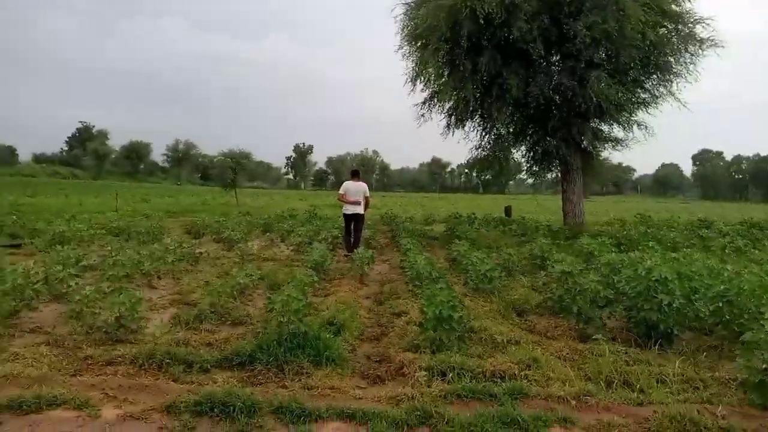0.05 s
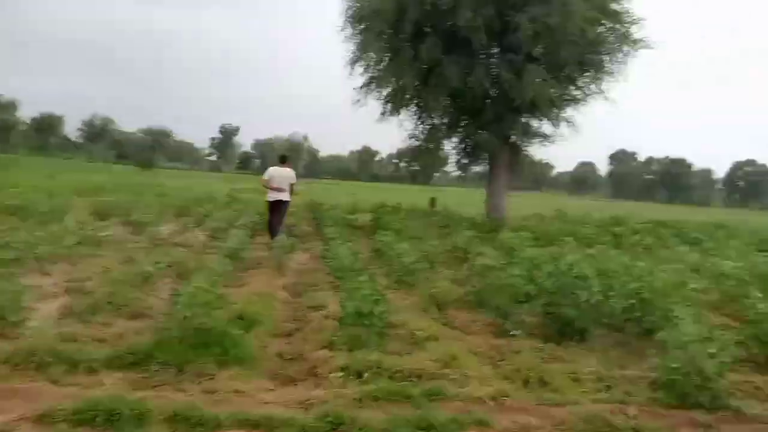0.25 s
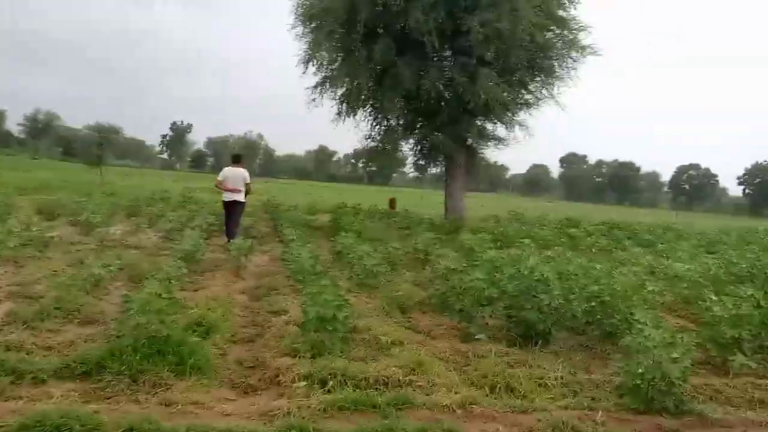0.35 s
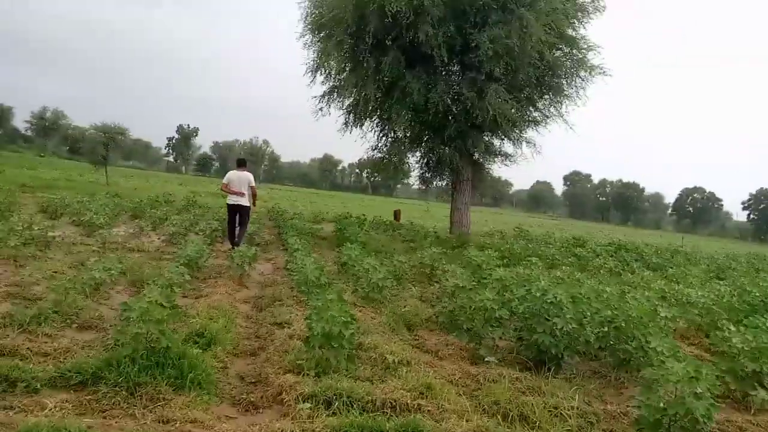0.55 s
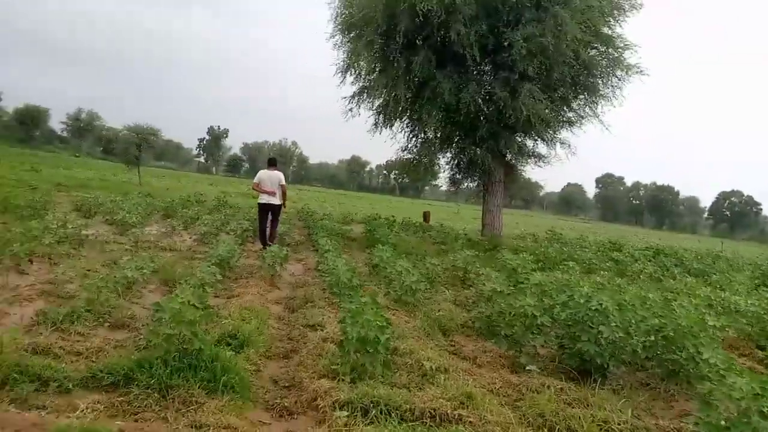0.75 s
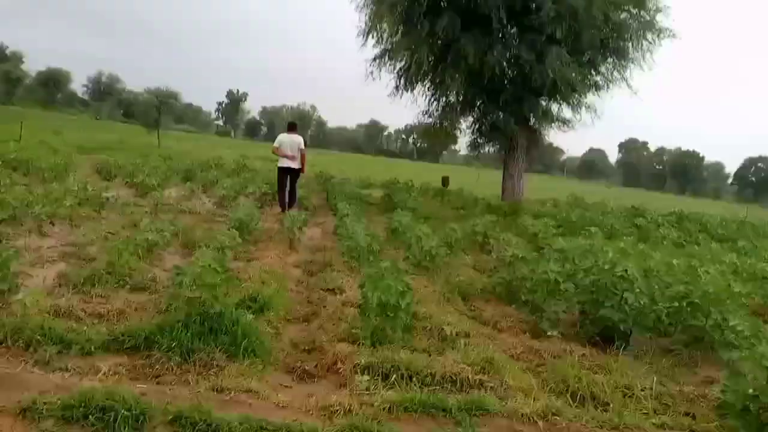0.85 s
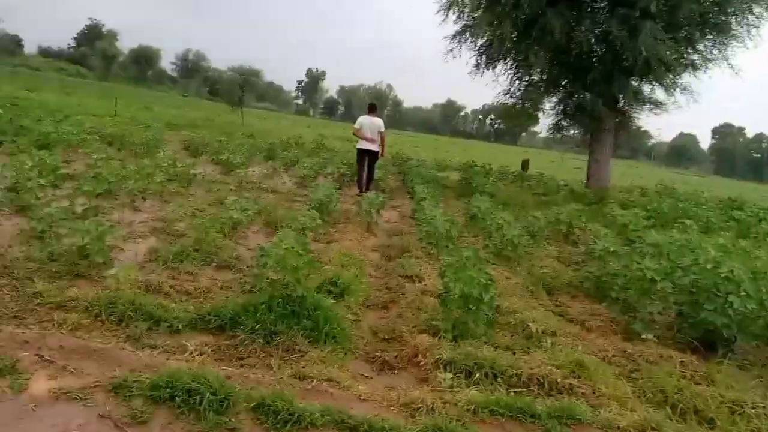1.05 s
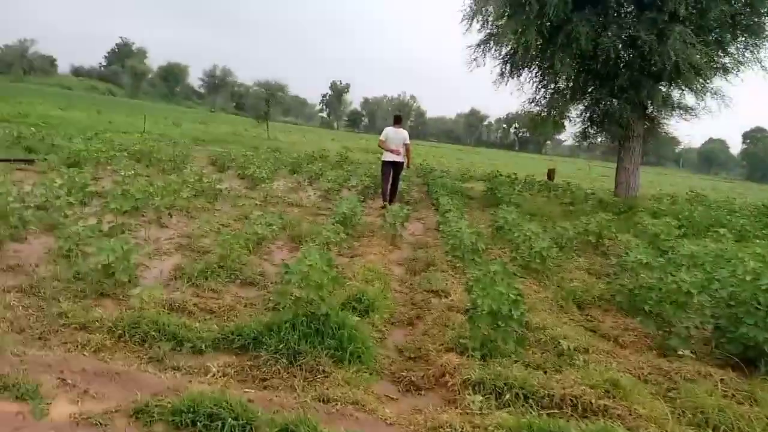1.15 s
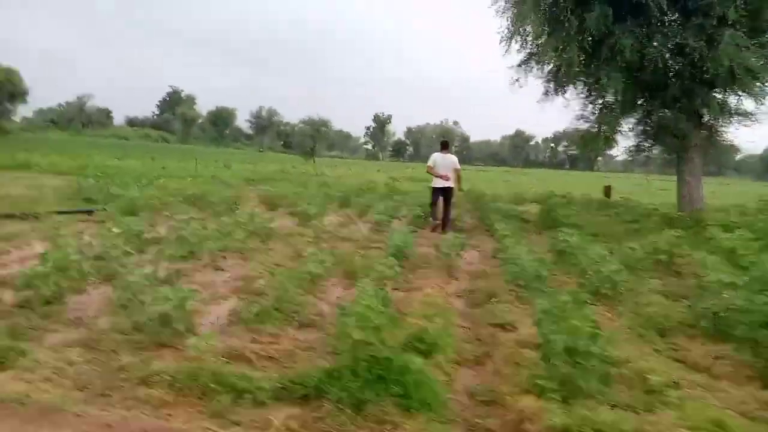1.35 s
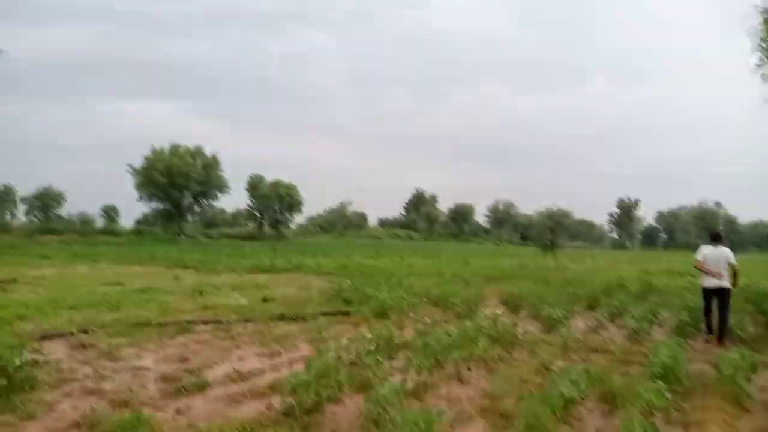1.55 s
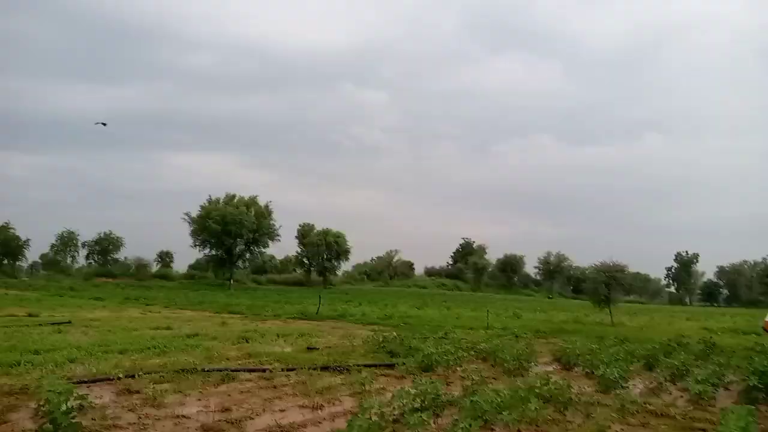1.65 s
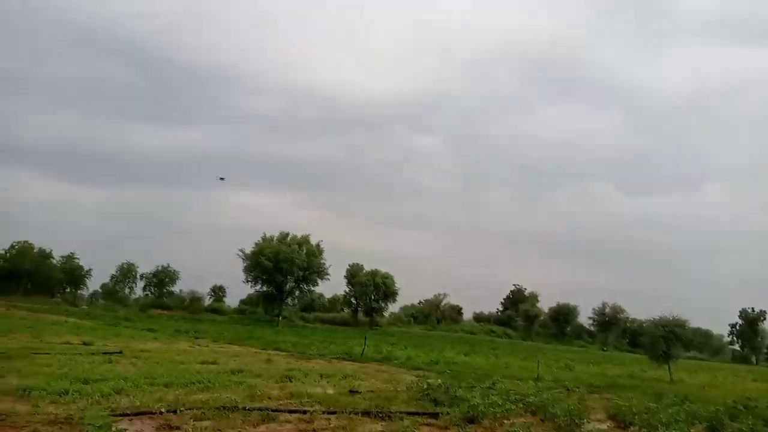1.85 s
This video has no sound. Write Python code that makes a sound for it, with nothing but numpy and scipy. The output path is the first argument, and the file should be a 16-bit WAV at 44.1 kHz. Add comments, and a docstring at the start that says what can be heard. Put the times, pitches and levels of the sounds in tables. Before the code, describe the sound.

A shrill bird yelps twice, then gives a long falling note that flicks upward, and repeats the pattern. Soft footsteps on soil, rustling leaves and faint distant birds lie underneath in an open field.

```python
"""Over an open field the air rumbles faintly, leaves brush and far birds call, wail and chirp.
Dry stalks snap; then a shrill bird, probably a lapwing, yelps twice as soft steps begin on the soil.
A long note follows, sliding down and flicking up. Each yelp and slide opens in a rasping flutter
and then clears: harmonics from the syrinx, filtered by throat and beak, scattered by crops and trees.
From 1.1 s the bird scolds in the same way again, and a second far wail closes the scene."""
import sys
import numpy as np
from scipy import signal
from scipy.fft import rfft, irfft
from scipy.io import wavfile
from scipy.ndimage import uniform_filter1d

SR = 44100
rng = np.random.default_rng(int(sys.argv[2]) if len(sys.argv) > 2 else 0)


def to_wav(s):
    """Save 16-bit WAV."""
    ch = np.atleast_2d(s).T  # columns
    pcm = np.round(np.clip(ch, -1, 1) * 32767)  # PCM
    wavfile.write(sys.argv[1], SR, pcm.astype(np.int16))


N = 83790
TIME = np.arange(N) / SR

# spectra of moving air, low rumble and thuds, stalks and leaves, dry soil: f/Hz, gain/dB
AIR_SPECTRUM = [(20, -14), (55, -2), (90, -4.5), (160, 0), (260, -7), (800, -18), (1100, -16), (1600, -8),
                (2100, 3), (2700, 4.5), (3000, -22), (3600, -17), (4200, 1.5), (5500, -7), (6700, -6),
                (7400, -17), (9000, -52), (15000, -47)]
LOW_SPECTRUM = [(20, 7), (45, -25), (70, 7), (140, -1), (250, -19), (700, -27), (2000, -85)]
STALK_SPECTRUM = [(500, -35), (2000, 4.5), (4000, -12.5), (6200, -5), (9000, -13.5), (15000, -21.5)]
SOIL_SPECTRUM = [(300, -30), (900, -26), (1400, -9), (2100, -3.5), (3000, -18), (6000, -19), (15000, -36)]
# envelopes of the rumble and of brushing leaves: t/s, level/dB
RUMBLE_LEVELS = [(0, -66), (.08, -78), (.21, -72), (.29, -91), (.42, -67.5), (.53, -76), (.64, -84.5),
                 (.8, -77), (.93, -85), (1.01, -72.5), (1.08, -80), (1.72, -84.5), (1.9, -75.5)]
RUSTLE_LEVELS = [(0, -85), (.06, -73.5), (.13, -69), (.2, -71), (.6, -66), (.73, -55.5), (.79, -66),
                 (.95, -85), (1.2, -70.5), (1.45, -67), (1.62, -64.5), (1.72, -81), (1.9, -81)]
# responses of throat and beak, and of scattering vegetation: f/Hz, gain/dB
THROAT_RESPONSE = [(1000, -38.5), (1350, -15), (1600, -12.5), (2000, -6), (2780, 2.5), (3300, 3),
                   (4120, -6), (4700, -1.5), (5400, -7), (6000, -15), (6700, -4), (7100, -8.5), (7500, -7),
                   (8150, -20.5), (8700, -35), (9600, -29.5), (10900, -28), (12800, -41.5), (15000, -39.5)]
SCATTER_RESPONSE = [(500, -23), (1400, 1), (2100, -8.5), (2750, -0.5), (3300, -2), (4100, 5), (6700, 1),
                    (7600, -6), (9000, 7), (15000, -32.5)]
# far bird of the scolding kind: t/s, duration/s, first f/Hz, last f/Hz, source level/dB
FAR_CALL_NOTES = [(0, 0.053, 1172, 1000, -69.5), (0.104, 0.072, 1100, 1343, -65),
                  (0.871, 0.076, 1410, 1295, -73.5), (1.798, 0.065, 981, 1194, -62.5),
                  (1.831, 0.017, 1480, 1640, -87)]
# far wails, perhaps peafowl, one course each: t/s, f/Hz, level/dB
WAIL_COURSES = [
    [(0, 1227, -68.5), (.16, 1194, -70), (.25, 1291, -59), (.37, 1226, -64.5), (.43, 1224, -58.5),
     (.5, 1095, -66.5), (.56, 1064, -69.5)],
    [(1.56, 1270, -70), (1.68, 1256, -71), (1.8, 1278, -68.5), (1.87, 1234, -72), (1.9, 1262, -68.5)],
]
# snapping stalks: t/s, level/dB
STALK_SNAPS = [(0.111, -54.5), (0.14, -59.5), (1.461, -76)]
# distant chirps, and at 1.022 s a pure rising tone of the far bird: t/s, duration/s, first f/Hz, last f/Hz,
# level/dB
CHIRP_NOTES = [(0.177, 0.0085, 6650, 5900, -65), (0.899, 0.011, 6120, 5100, -59.5),
               (0.914, 0.039, 7540, 6110, -63.5), (0.988, .022, 5450, 4940, -67.5),
               (1.022, .075, 1413, 1670, -69), (1.033, 0.05, 7060, 6150, -61),
               (1.113, .02, 5520, 4900, -64.5), (1.803, .06, 6010, 6580, -64)]
# yelps: t/s, duration/s, top f/Hz, final droop/fraction of f, source level/dB, overtones/dB,
# third harmonic/dB, flutter beats, beat period/s, roughness
YELP_NOTES = [(.207, 0.053, 1364, 0.079, -37, 2.5, -2, 2, 0.014, 0.65),
              (.320, 0.076, 1371, 0.032, -34.5, 0, 5, 3, 0.0138, 0.54),
              (1.136, 0.049, 1387, 0.077, -34.5, -2, -2, 2, 0.01357, 0.5),
              (1.247, 0.076, 1418, 0.083, -35.5, 2, 0, 5, .0143, 0.42)]
# footfalls: t/s, knock f/Hz, knock level/dB, thud level/dB, crunch level/dB
FOOTFALLS = [(0.302, 342, -68, -101, -52.5), (0.681, 343, -62.5, -102, -55), (.912, 560, -74, -80, -62.5),
             (1.455, 480, -61, -54, -85)]
# long notes: flutter beats, beat period/s, roughness, course of (t/s, f/Hz, source level/dB, overtones/dB)
SLIDE_NOTES = [(5, .0132, 1.54, [(.469, 1325, -34.5, 1.5), (.503, 1380, -37.5, 2.5),
               (.545, 1320, -34, -4.5), (.565, 1312, -40, -2), (.584, 1230, -33.5, -10),
               (.612, 1133, -32.5, -18), (.648, 1019, -35, -21.5), (.672, 1014, -49.5, -17),
               (.70, 1008, -49.5, -14), (.718, 1057, -36.5, -23)]),
               (4, 0.01425, 1.04, [(1.396, 1380, -40.5, 6.5), (1.428, 1372, -39, 4),
               (1.468, 1343, -38.5, -4), (1.50, 1288, -41.5, -5), (1.536, 1135, -31.5, -20.5),
               (1.562, 1009, -38.5, -23.5), (1.58, 996.5, -36, -21.5), (1.61, 967.5, -33.5, -41),
               (1.631, 989, -51, -21)])]
# brief dips in the long notes: t/s, depth/dB (a negative depth is a lift)
SLIDE_DIPS = [(.564, -1.5), (.597, 15), (.624, 8), (1.511, -0.5), (1.56, 10.5)]
# upward flicks: t/s, duration/s, first f/Hz, last f/Hz, source level/dB, final overtones/dB
FLICK_NOTES = [(.718, 0.031, 1438, 1641, -44.5, 7.5), (1.629, .054, 1303, 1640, -50, 6.5)]

ATTACK_S, RELEASE_S = .0012, .003
JITTER, JITTER_RATE_HZ, SHIMMER_DB, SHIMMER_RATE_HZ = .022, 750, 2.5, 190
RASP_DB, PURE_BELOW_HZ = -44, 1300
FLUTTER_DIP_DB, FLUTTER_SAG, CLEAR_ROUGHNESS = 11.5, .0554, .12
SWELL_DB, SWELL_S = 6, .013
SCOOP, SCOOP_S, DROOP_S = .0197, .0146, .00852
STEP_ATTACK_S, KNOCK_DECAY_S, THUD_DECAY_S = .0034, .014, .072


def from_db(db):
    """Amplitude ratio: a factor of ten for every 20 dB."""
    return 10 ** (np.asarray(db) / 20)


def gain_at(spectrum, hz):
    """Frequency response, interpolated in decibels over log frequency."""
    f, db = np.transpose(spectrum)
    return from_db(np.interp(np.log(np.maximum(hz, 1)), np.log(f), db))


def noise(spectrum):
    """Spectral shaping colours white noise; the result has unit rms."""
    x = irfft(rfft(rng.standard_normal(N)) * gain_at(spectrum, np.fft.rfftfreq(N, 1 / SR)), N)
    return x / x.std()


def drift(rate_hz):
    """Low-pass filtering of noise gives a smooth fluctuation of unit variance."""
    x = irfft(rfft(rng.standard_normal(N)) / (1 + (np.fft.rfftfreq(N, 1 / SR) / rate_hz) ** 2), N)
    return x / x.std()


def gate(start, end):
    """Envelope of a driven oscillation: linear attack, hold, exponential release."""
    return np.clip((TIME - start) / ATTACK_S, 0, 1) * np.exp(-np.maximum(TIME - end, 0) / RELEASE_S)


def arch(start, length):
    """Half-sine amplitude envelope."""
    return np.sin(np.pi * np.clip((TIME - start) / length, 0, 1))


def impact(start, attack_s, decay_s):
    """Envelope of a damped impact: linear rise, exponential decay."""
    age = TIME - start
    return np.clip(age / attack_s, 0, 1) * np.exp(-np.maximum(age - attack_s, 0) / decay_s)


def glide(start, length, first_hz, last_hz):
    """Linear frequency sweep."""
    return np.interp(TIME, [start, start + length], [first_hz, last_hz])


def phase_of(hz):
    """Phase is the time integral of angular frequency."""
    return 2 * np.pi * np.cumsum(hz) / SR


def moving_air(hiss_db=-70):
    """Superposition of steady broadband noise and an amplitude-modulated rumble."""
    hiss = from_db(hiss_db) * noise(AIR_SPECTRUM)
    return hiss + from_db(np.interp(TIME, *np.transpose(RUMBLE_LEVELS))) * noise(LOW_SPECTRUM)


def leaves(crackle_db=2):
    """Friction of leaves makes noise; random amplitude modulation makes it crackle."""
    level_db = np.interp(TIME, *np.transpose(RUSTLE_LEVELS)) + crackle_db * drift(rate_hz=250)
    return from_db(level_db) * noise(STALK_SPECTRUM)


def syrinx(pitch, envelope, overtones_db, roughness, fundamental_db=0, third_db=0, count=12):
    """Source-filter model: the throat shapes jittering harmonics and a rasp pulsed once a cycle."""
    on = envelope > 1e-6
    hz, bright, rough = (np.broadcast_to(v, N)[on] for v in (pitch, from_db(overtones_db), roughness))
    phase = phase_of(hz * (1 + JITTER * rough * drift(JITTER_RATE_HZ)[on]))
    shimmer_db = SHIMMER_DB * drift(SHIMMER_RATE_HZ)
    octaves_below = np.maximum(np.log2(PURE_BELOW_HZ / hz), 0)
    voice = from_db(RASP_DB) * rough * noise(THROAT_RESPONSE)[on] * (1 + np.cos(phase))
    for k in range(1, count + 1):
        weight = from_db({1: fundamental_db, 3: third_db}.get(k, 0))
        if k >= 3:   # the overtones shimmer; above the third harmonic they weaken at low pitch
            loss_db = 6 * octaves_below * np.sqrt(k - 3)
            weight = weight * bright * from_db(np.roll(shimmer_db, k * N // count)[on] - loss_db)
        harmonic = np.sqrt(2) * np.cos(k * phase + rng.normal(0, .99))
        voice += weight * gain_at(THROAT_RESPONSE, k * hz) * harmonic
    out = np.zeros(N)
    out[on] = voice * envelope[on]
    return out


def far_calls():
    """A harmonic series swept in frequency gives each faint call of the far bird."""
    out = 0
    for start, length, first_hz, last_hz, db in FAR_CALL_NOTES:
        pitch = glide(start, length, first_hz, last_hz)
        envelope = from_db(db) * arch(start, length)
        out += syrinx(pitch, envelope, overtones_db=-4, roughness=.62, fundamental_db=6.5, third_db=-11)
    return out


def far_wails(subharmonic_db=-25.5):
    """A slowly bending tone carries a weak subharmonic one octave below."""
    out = 0
    for course in WAIL_COURSES:
        times, hz, db = np.transpose(course)
        phase = phase_of(np.interp(TIME, times, hz))
        tone = np.sin(phase) + from_db(subharmonic_db) * np.sin(phase / 2)
        out += gate(times[0], times[-1]) * from_db(np.interp(TIME, times, db)) * tone
    return out


def field_scatter(sound):
    """Diffuse reflection from vegetation is convolution with exponentially decaying noise."""
    response = 0
    for db, t60_s in ((-15, .15), (-21.5, 1)):   # crops, trees
        tail = noise(SCATTER_RESPONSE) * from_db(-60 * TIME / t60_s)
        response += from_db(db) * tail / np.linalg.norm(tail)
    return signal.fftconvolve(sound, response)[:N]


def stalk_snaps():
    """Brittle fracture of a dry stalk radiates a quickly damped noise burst."""
    envelope = sum(from_db(db) * impact(start, ATTACK_S, decay_s=.004) for start, db in STALK_SNAPS)
    return envelope * noise(STALK_SPECTRUM)


def far_chirps(waver=.012):
    """Random frequency modulation roughens thin swept sine tones."""
    out = 0
    for start, length, first_hz, last_hz, db in CHIRP_NOTES:
        pitch = glide(start, length, first_hz, last_hz) * (1 + waver * drift(JITTER_RATE_HZ))
        out += from_db(db) * arch(start, length) * np.sin(phase_of(pitch))
    return out


def fluttered_note(start, end, pitch, level_db, overtones_db, beats, beat_s, roughness, third_db=0):
    """Joint modulation: late in each opening beat the voice dips, sags and roughens; then it clears."""
    age = np.maximum(TIME - start, 0)
    beat = age / beat_s
    dips = sum(np.exp(-.5 * ((beat - k - .89) / .1303) ** 2) for k in range(beats))
    rough = CLEAR_ROUGHNESS + roughness * (dips + .5 * np.clip(beats + .5 - beat, 0, 1))
    envelope = gate(start, end) * from_db(level_db - FLUTTER_DIP_DB * dips - SWELL_DB * np.exp(-age / SWELL_S))
    bright_db = overtones_db + 5 * dips   # the overtones dip less than the main tone
    return syrinx(pitch * (1 - FLUTTER_SAG * dips), envelope, bright_db, rough, third_db=third_db)


def yelps():
    """Onset and offset transients: each short note scoops up to its pitch and droops as it stops."""
    out = 0
    for start, length, hz, droop, db, overtones_db, third_db, beats, beat_s, roughness in YELP_NOTES:
        age = np.clip(TIME - start, 0, length)
        pitch = hz * (1 - SCOOP * np.exp(-age / SCOOP_S) - droop * np.exp((age - length) / DROOP_S))
        end = start + length - RELEASE_S / 2
        out += fluttered_note(start, end, pitch, db, overtones_db, beats, beat_s, roughness, third_db)
    return out


def footsteps():
    """Damped impacts on soil: a dull knock and a crunch die quickly, a low thud more slowly."""
    out, thud = 0, noise(LOW_SPECTRUM)
    for start, hz, knock_db, thud_db, crunch_db in FOOTFALLS:
        knock = noise([(hz / 2, -18), (hz, 0), (hz * 1.3, -13), (hz * 4, -16), (hz * 10, -40)])
        contact = from_db(knock_db) * knock + from_db(crunch_db) * noise(SOIL_SPECTRUM)
        out += contact * impact(start, STEP_ATTACK_S, KNOCK_DECAY_S)
        out += from_db(thud_db) * thud * impact(start, STEP_ATTACK_S, THUD_DECAY_S)
    return out


def slides(dip_width_s=.0033):
    """Downward glissando: the tone of each long note grows purer as its overtones weaken."""
    out = 0
    dips_db = sum(depth * np.exp(-.5 * ((TIME - when) / dip_width_s) ** 2) for when, depth in SLIDE_DIPS)
    for beats, beat_s, roughness, course in SLIDE_NOTES:
        times, *columns = np.transpose(course)
        hz, db, overtones_db = (np.interp(TIME, times, column) for column in columns)
        pitch = uniform_filter1d(hz, size=500)
        out += fluttered_note(times[0], times[-1], pitch, db - dips_db, overtones_db, beats, beat_s, roughness)
    return out


def flicks(swell_db=3, swell_s=.022, opening_db=42.5):
    """A frequency jump ends each long note: the pitch sweeps up while the overtones grow."""
    out = 0
    for start, length, first_hz, last_hz, db, final_overtones_db in FLICK_NOTES:
        age = np.clip(TIME - start, 0, length)
        pitch = glide(start, length, first_hz, last_hz)
        swell = from_db(db - swell_db * np.exp(-age / swell_s))
        envelope = gate(start, start + length - RELEASE_S / 2) * swell
        overtones_db = final_overtones_db - opening_db * (1 - age / length)
        out += syrinx(pitch, envelope, overtones_db, roughness=.59, fundamental_db=11.5, third_db=-2.5)
    return out


def scene():
    """Linear superposition of the birds, their reflections, the ground sounds and the air."""
    birds = yelps() + slides() + flicks() + far_calls() + far_chirps() + far_wails()
    ground = leaves() + stalk_snaps() + footsteps()
    return (birds + field_scatter(birds) + ground + moving_air())[None]


def record(dry, cutoff_hz=15700):
    """An elliptic low-pass filter cuts the highest treble steeply."""
    return signal.sosfilt(signal.ellip(10, .1, 70, cutoff_hz, fs=SR, output="sos"), dry)


dry = scene()
out = record(dry)
to_wav(out)
```